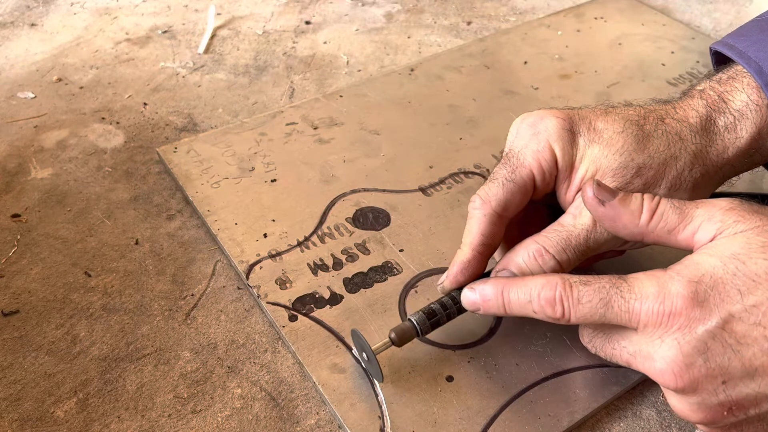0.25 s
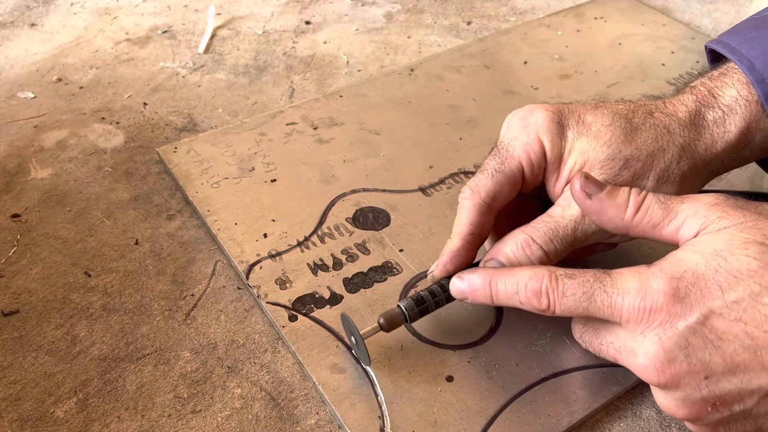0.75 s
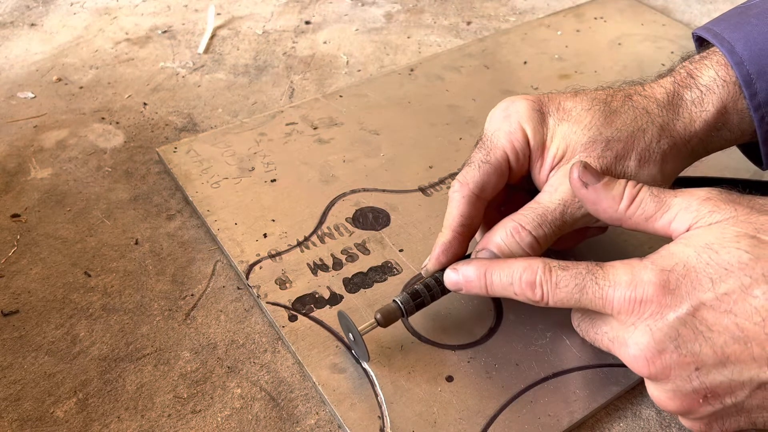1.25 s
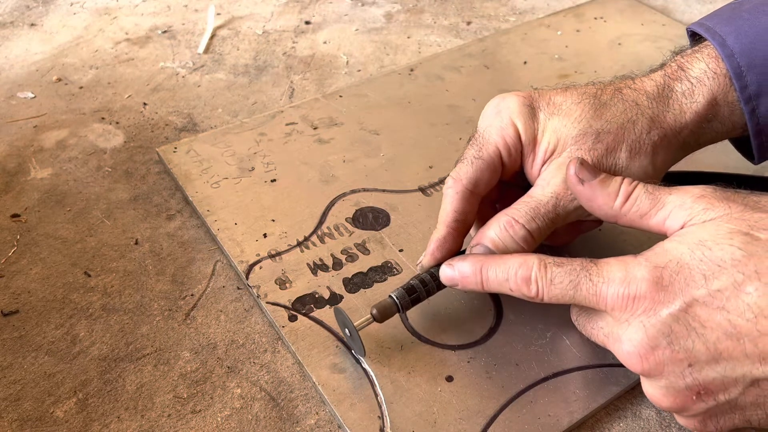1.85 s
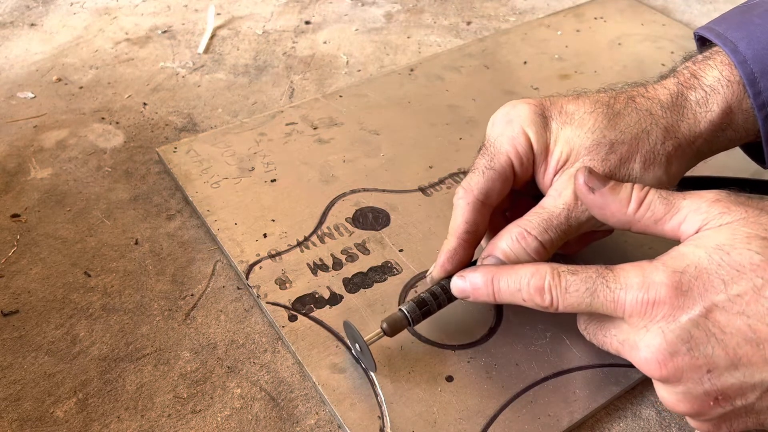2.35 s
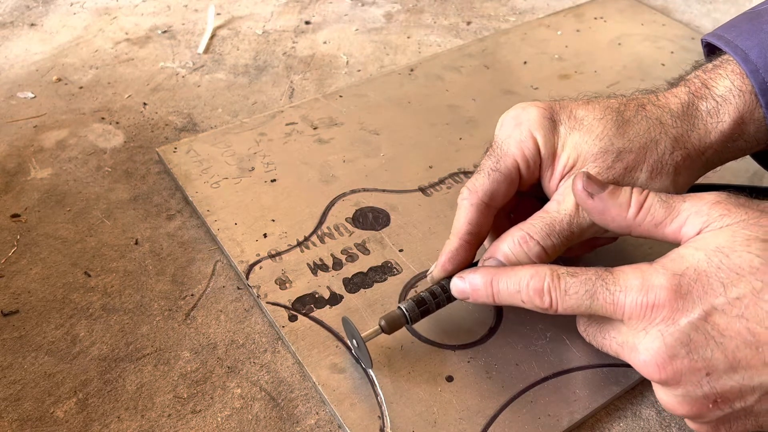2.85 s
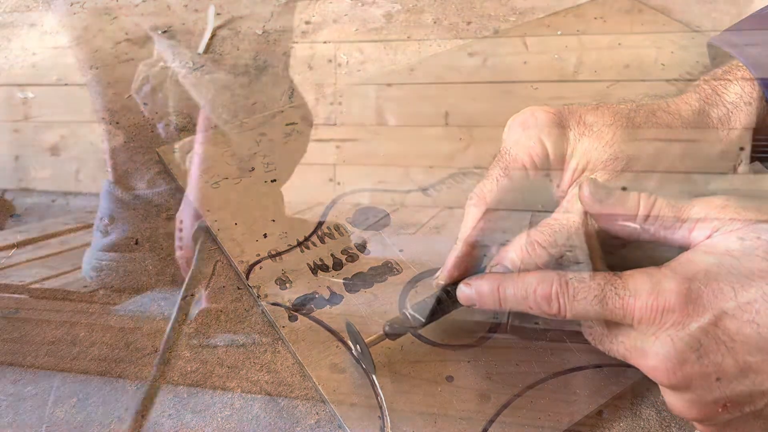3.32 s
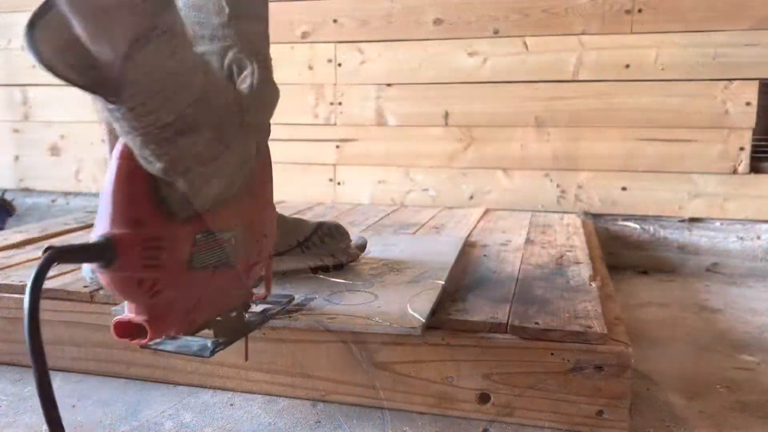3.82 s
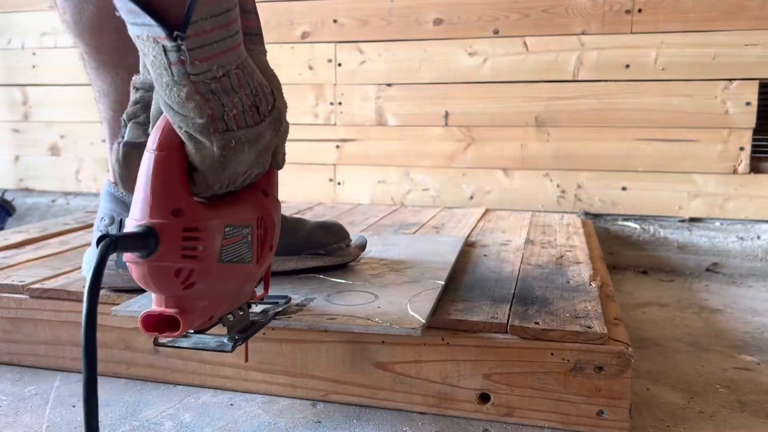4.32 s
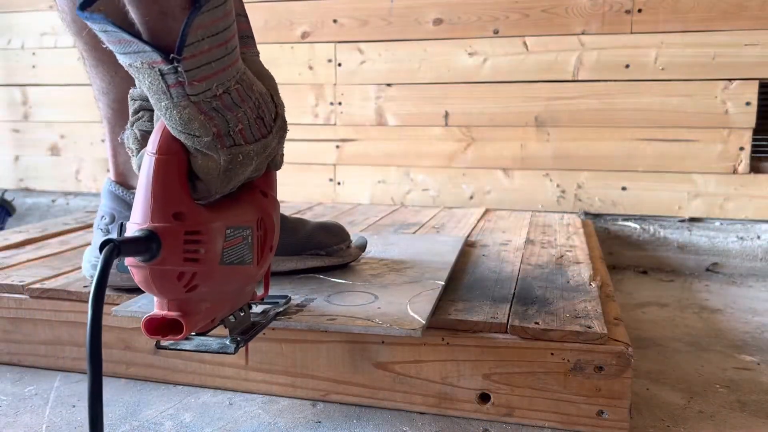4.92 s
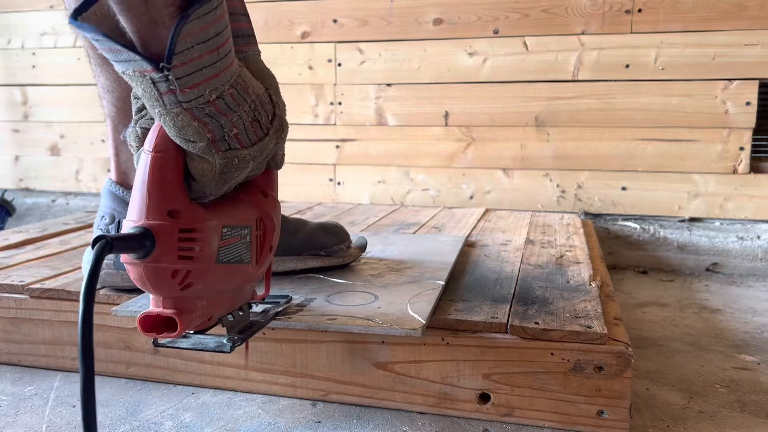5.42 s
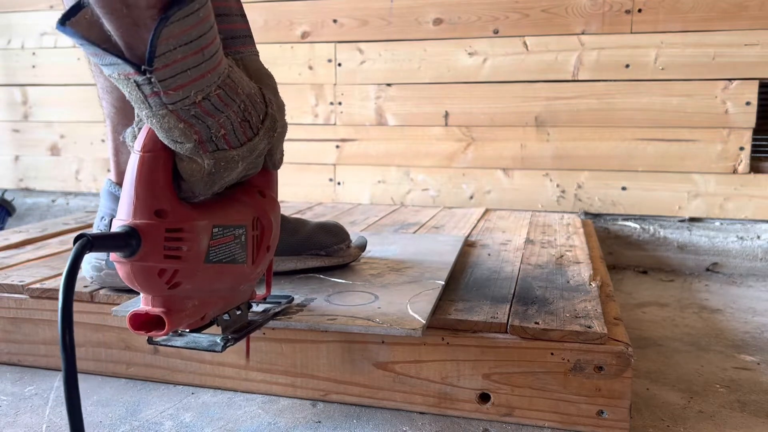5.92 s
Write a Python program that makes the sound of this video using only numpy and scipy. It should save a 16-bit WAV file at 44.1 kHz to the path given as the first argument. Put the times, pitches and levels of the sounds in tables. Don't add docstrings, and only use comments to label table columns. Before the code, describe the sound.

Phone-close stereo workshop sound. First a high-speed cutting disc bites aluminium, its bright abrasive spray and singing tones swelling with hand pressure. It chatters and dissolves into a quieter wooden room with low hum, dull board knocks and a short scrape. A hard thump starts a jigsaw, accelerating into a dense metallic rattle, coarse rasp and high gear whine, with short shed reflections.

```python
import sys
import numpy as np
from scipy import signal
from scipy.fft import rfft, irfft, next_fast_len
from scipy.io import wavfile
from scipy.ndimage import uniform_filter1d

SR = 44100
rng = np.random.default_rng(int(sys.argv[2]) if len(sys.argv) > 2 else 0)


def persist_wave(psi):
    counts = np.round(np.clip(psi, -1, 1) * 32767).astype(np.int16)
    wavfile.write(sys.argv[1], SR, np.atleast_2d(counts).T)


def voltage_ratio(decibels):
    exponent = np.asarray(decibels, float) / 20
    return 10 ** exponent


N = 272097
T = np.arange(N) / SR
M = next_fast_len(N + SR // 2)
HZ = np.arange(M // 2 + 1) * SR / M + 1


def curves(table):
    s, *columns = np.transpose(table)
    return [np.interp(T, s, column) for column in columns]


def along(table):
    hz, value = np.transpose(table)
    return np.interp(np.log(HZ), np.log(hz + 1), value)


def unit(x):
    return x / np.sqrt(np.mean(x ** 2))


def bump(x, centre, width):
    return np.exp(-((x - centre) / width) ** 2)


def ramp(start_s, length_s):
    return ((T - start_s) / length_s).clip(0, 1)


def walk(rate):
    k = int(SR / rate)
    steps = np.repeat(rng.standard_normal(N // k + 1), k)
    return 1.35 * uniform_filter1d(uniform_filter1d(steps, k), k)[:N]


def grains(spread_db):
    return rng.standard_normal(N) * voltage_ratio(spread_db * rng.exponential(size=N))


def highpass(x, hz):
    return signal.lfilter(*signal.butter(2, hz, "high", fs=SR), x)


def colour(x, spectrum):
    return unit(irfft(rfft(x, M) * voltage_ratio(along(spectrum)), M)[:N])


def patchy(x, spread_db):
    z = signal.stft(x, nperseg=1024)[2]
    field = rng.standard_normal(z.shape)
    for size, axis in ((5, 0), (5, 0), (8, 1), (8, 1)):
        field = uniform_filter1d(field, size=size, axis=axis)
    return unit(signal.istft(z * voltage_ratio(spread_db * unit(field)), nperseg=1024)[1][:N])


def mode(x, hz, width):
    return signal.lfilter(*signal.iirpeak(hz, hz / width, fs=SR), x)


def rings(x, modes, patchy_db, rate, focus_hz=None, focus_db=0, sings=()):
    out = 0
    for hz, width, db in modes:
        octaves_away = 0 if focus_hz is None else np.abs(np.log2(hz / focus_hz))
        swell_db = sum(up_db * bump(T, s, length) for s, length, f, up_db in sings if abs(np.log2(f / hz)) < .1)
        ring = unit(mode(x * voltage_ratio(patchy_db * walk(rate)), hz, width))
        out = out + voltage_ratio(db + swell_db - focus_db * octaves_away) * np.sqrt(width) * ring
    return unit(out)


# frequency in Hz, level in dB per Hz.
SHED_SPECTRUM = [(15, -30), (25, 10.5), (149, -11), (291, -20), (475, -20.5), (527, -22.5), (1600, -31),
                 (4500, -35.5), (8150, -28), (11100, -42), (12000, -71), (15600, -94), (22000, -120)]
# time in seconds, gain in dB.
SHED_FADE = [
    (0, 6),
    (3, 3),
    (3.5, 15),
    (6.17, 5),
]


def shed():
    hum = colour(rng.standard_normal(N) * voltage_ratio(1.1 * walk(5.8)), SHED_SPECTRUM)
    return hum * voltage_ratio(-56 + curves(SHED_FADE)[0])


# start in seconds, peak in dB, ring in Hz, t60 in seconds, tick in dB.
KNOCKS_ON_BOARDS = [(3.048, -41, 144, 0.091, -11), (3.297, -34.5, 85, 0.51, -25),
                    (3.421, -45, 387, 0.73, -30), (4.051, -44, 917, 0.12, -17),
                    (4.22, -40, 298, 0.057, -20), (3.2, -35, 192, 0.11, -28), (3.277, -21, 200, 0.089, -33),
                    (3.289, -30.5, 177, 0.51, -20), (3.326, -23.5, 349, 0.2, -30),
                    (3.334, -25.5, 720, 0.15, -27), (3.345, -30.5, 1060, 0.16, -25),
                    (3.374, -32, 185, 0.23, -34), (3.498, -19, 2100, 0.015, -8),
                    (3.509, -34.5, 131, 0.22, -32), (3.782, -39.5, 600, 0.15, 13),
                    (3.821, -33, 322, 0.054, -26.5), (4.163, -25.5, 423, 0.024, -23),
                    (4.33, -41, 746, 0.063, -30), (4.505, -42.5, 382, 0.12, 6),
                    (4.589, -28.5, 405, 0.073, -11), (4.603, -24.5, 349, 0.13, -1),
                    (4.667, -5, 352.5, 0.15, -38), (4.739, -10.5, 190, 0.15, -48),
                    (5.531, -3.5, 794, 0.056, -23)]


def knocks():
    out, t = np.zeros(N + SR), T[:SR // 2]
    noises = rng.standard_normal((len(KNOCKS_ON_BOARDS), len(t)))
    for (s, db, hz, t60, tick_db), noise in zip(KNOCKS_ON_BOARDS, noises):
        rough = 0.8 * np.sin(2 * np.pi * hz * t)
        rough = rough + 0.5 * unit(mode(noise, hz, 0.5 * hz)) + 0.054 * unit(mode(noise, 2.1 * hz, 1.0 * hz))
        ring = rough * (1 - np.exp(-t / 0.0034)) * voltage_ratio(-60 * t / (1.05 * t60))
        tick = voltage_ratio(tick_db) * noise * np.exp(-t / 0.00062)
        out[int(s * SR):][:len(t)] += voltage_ratio(db) * (ring + tick)
    return out[:N]


# time in seconds, level in dB.
SLIDE_LEVEL = [(3.98, -69), (4.01, -60), (4.04, -49), (4.07, -48), (4.085, -47), (4.102, -46),
               (4.107, -37.5), (4.125, -33), (4.145, -33.5), (4.165, -30.5), (4.188, -48), (4.32, -59.5),
               (4.5, -70)]
# frequency in Hz, level in dB per Hz.
SCRAPE_SPECTRUM = [(180, -56), (300, -34), (1630, -2.5), (4540, -11), (7760, -1), (12800, -10.5),
                   (13700, -30), (15200, -1), (16500, -30)]


def slide():
    scrape = colour(grains(spread_db=3.0) * voltage_ratio(2.296 * walk(90)), SCRAPE_SPECTRUM)
    moving = (T > SLIDE_LEVEL[0][0]) * (T < SLIDE_LEVEL[-1][0])
    return scrape * voltage_ratio(curves(SLIDE_LEVEL)[0] + 2.0) * moving


# start in seconds, level in dB.
SHEET_SLAPS = [(4.609, -18), (4.641, -7), (4.675, -12), (4.706, -3), (4.743, -2), (4.781, -1), (4.815, 3),
               (4.849, 2), (4.878, 3), (4.906, -1), (4.934, 0.5), (4.959, -21), (4.985, -11), (5.011, -1.5),
               (5.031, -9), (5.055, -6), (5.083, -12), (5.108, -10), (5.133, -8), (5.157, -8), (5.183, -17),
               (5.202, -16), (5.231, -13), (5.295, -17), (5.354, -10), (5.401, -10), (5.427, -11),
               (5.454, -8), (5.478, -11), (5.507, -13), (5.532, -15), (5.574, -10), (5.61, -7),
               (5.638, -6.5), (5.667, -15), (5.694, -11), (5.714, -16), (5.747, -8), (5.776, -13),
               (5.803, -17), (5.83, -8), (5.883, -8), (5.909, -13), (5.94, -9), (5.993, -9.5), (6.046, -7),
               (6.077, -12), (6.106, -10), (6.149, -12)]


def slaps():
    rise_s, fall_s = 0.0013, 0.0028
    s, db = np.transpose(SHEET_SLAPS)
    hits, t = np.zeros(N), T[:SR // 20]
    hits[(s * SR).astype(int).clip(0, N - 1)] = voltage_ratio(1.1 * (db - uniform_filter1d(db, size=9)))
    shape = (1 - np.exp(-t / rise_s)) * np.exp(-t / fall_s)
    return signal.fftconvolve(hits, shape / shape.max())[:N]


# time in seconds, gear mesh in Hz, sawing in dB, focus in the sheet in Hz.
SAWING = [(4.57, 1167, -62, 1300), (4.635, 1480, -21, 1350), (4.655, 1600, -15, 1340),
          (4.69, 2195, -19.5, 1390), (4.8, 2856, -19, 1220), (4.87, 3140, -18.5, 1060),
          (4.94, 3450, -15.5, 1960), (5.05, 3716, -17, 2020), (5.12, 3730, -18, 1560),
          (5.25, 3900, -13.5, 1440), (5.4, 3820, -14, 1070), (5.54, 3410, -17.5, 1010),
          (5.7, 3470, -19, 1200), (5.76, 3346, -21, 900), (5.86, 3400, -22, 930), (5.95, 3414, -17.5, 953),
          (6.02, 3330, -24, 990), (6.17, 3390, -22, 1050)]
# time in seconds, strokes per second.
BLADE_STROKES = [(4.57, 12.5), (4.64, 16.5), (4.7, 24.3), (4.802, 30.8), (4.924, 36.6), (5.09, 41.1),
                 (5.252, 42), (5.318, 41.4), (5.416, 39.9), (5.55, 37.7), (5.67, 36.6), (6.17, 36.1)]
# multiple of the stroke, level in dB.
STROKE_HARMONICS = [(2, -8.5), (3, -7.5), (4, -11), (5, -10), (6, -13.5), (7, -9), (8, -22), (9, -15.5),
                    (10, -11), (11, -22), (12, -10.5), (13, -6), (14, -12.5), (15, -14)]
# frequency in Hz, width in Hz, level in dB.
BOARD_MODES = [(110, 68, -19), (198, 11, -4.5), (292, 26, -10.5), (355, 22, 6.5), (468, 32, -4),
               (591, 106, -9)]
# frequency in Hz, width in Hz, level in dB.
PLATE_MODES = [(720, 250, -4.5), (900, 147, -1.5), (1060, 47, -13), (1262, 100, 0), (1440, 130, -5),
               (1747, 83, -1), (1960, 120, -0.5), (2100, 80, 0), (2300, 220, -13.5), (2730, 210, -4),
               (3460, 82, -16)]
# centre in seconds, length in seconds, frequency in Hz, gain in dB.
PLATE_SWELLS = [(3.2, 0.029, 1440, 14), (4.3, 0.027, 900, -4), (4.81, 0.069, 1440, 8.5),
                (5.03, 0.11, 900, 7.5), (4.95, 0.028, 1440, 8.5), (5.0, 0.12, 5800, 6),
                (5.06, 0.022, 2300, 10), (5.2, 0.036, 1200, 3), (5.2, .03, 2300, 9), (5.3, 0.074, 1274, 4),
                (6, 0.058, 1060, 16), (5.42, .06, 1753, 4), (11, .06, 2730, 4), (5.05, 0.093, 2730, -14),
                (4.88, .05, 720, -3), (5.6, 0.072, 720, 5), (6.5, 0.14, 900, -3.5), (5.46, 0.051, 1060, 10)]
# frequency in Hz, level in dB per Hz.
TEETH_SPECTRUM = [(29, -52), (50, -49), (181, -10), (287, -46), (357, 1.5), (655, -18), (876, -6.5),
                  (1610, -21), (2150, -11.5), (3450, -12.5), (3750, -14), (8780, -14), (10200, -16.5),
                  (11500, -20), (13900, -35), (14700, -31), (15500, -27), (16500, -58)]


def jigsaw():
    trigger_s, run_up_s = 4.605, 0.051
    jolt_s, jolt = 5.532, 4
    mesh_hz, saw_db, focus_hz = curves(SAWING)
    running = ramp(trigger_s, run_up_s) ** 2
    mesh = np.cumsum(mesh_hz) / SR
    stroke = np.cumsum(curves(BLADE_STROKES)[0]) / SR

    pull = 1.05 * slaps()
    cut = (1.8 + pull) * voltage_ratio(0.42 * walk(60)) * grains(spread_db=0.64)
    cut = cut * (1 + jolt * np.exp(-(T - jolt_s).clip(0) / 0.00071) * (T > jolt_s))

    pinned_db = -9 * ramp(5.47, .06)
    shake = 0
    for k, db in STROKE_HARMONICS:
        wander = voltage_ratio(2.5 * walk(5.4) + (k < 4) * pinned_db)
        shake = shake + voltage_ratio(db) * np.sin(2 * np.pi * k * stroke + k * k) * wander
    shake = shake + 1.5 * mode(shake, 189, 26.37) + 2.2 * mode(shake, 380, 32)
    shake = shake * (mesh_hz / 3750) ** 1.7 * voltage_ratio(-26.5)
    boards_db = -22.5 + 10.5 * bump(T, 4.685, 0.21) + 9 * bump(T, 5.57, 0.24)
    boards = (rings(cut, BOARD_MODES, patchy_db=4, rate=16) * voltage_ratio(boards_db - 6.5) + shake) * running

    plate = rings(cut, PLATE_MODES, patchy_db=1.0, rate=10, focus_hz=focus_hz, focus_db=8, sings=PLATE_SWELLS)
    plate = plate * voltage_ratio(saw_db - 2.5)

    rasp_db = -24 - 3.5 * (T - 4.8).clip(0)
    teeth = colour(cut * (6.5 + pull), TEETH_SPECTRUM) * voltage_ratio(rasp_db + 2.5) * running
    edge = signal.sosfiltfilt(signal.butter(6, 3600, "high", fs=SR, output="sos"), teeth)
    teeth = teeth - edge * (1 - voltage_ratio(-4 * ramp(5.56, 0.019)))

    gear_db = -32 + 17 * bump(mesh_hz, 2750, 320) + 7 * ramp(5.52, .05)
    whine = np.sin(2 * np.pi * mesh + .95 * walk(400))
    whine = whine + 0.44 * np.sin(2 * np.pi * 1.55 * mesh + 1.4 * walk(250))
    gear = whine * (0.35 + 0.76 * pull) * voltage_ratio(gear_db + 2.5 * walk(70)) * running

    return highpass((boards + plate + teeth + gear) * (T > SAWING[0][0]), 60)


# time in seconds, shaft turns in Hz, bounce in Hz.
SHAFT_SPEED = [(0, 255, 51), (.14, 255, 51), (.22, 267, 51), (.36, 311, 47), (.64, 318, 43), (.92, 329, 39),
               (1.14, 338, 39), (1.34, 325, 43), (1.76, 283, 47), (1.9, 268, 52), (2.32, 239, 59.5),
               (2.6, 236, 59), (2.81, 278, 59), (2.9, 286, 59), (3.02, 281, 59), (3.16, 257, 59),
               (3.35, 222, 48)]
# time in seconds, grinding in dB, flexing of the sheet in dB,
# bounce depth from 0 to 1, clean bite in dB.
HAND_PRESSURE = [(0, -23, -44, 0.6, -12), (.3, -23.5, -50, 0.4, -9.5), (.55, -22.5, -36, 0.45, -15.5),
                 (.8, -23.5, -31.5, 0.07, -16), (1.0, -24, -33, 0.38, -9), (1.2, -21, -34, 0.66, -24),
                 (1.4, -22, -32.5, 0.68, -43), (1.66, -22.5, -32.5, 0.9, -90), (1.95, -21.5, -37, 0.72, -6),
                 (2.14, -21, -45, 0.1, -21), (2.32, -25, -50, 0.58, -6.5), (2.62, -24, -38.5, 0.78, -8.5),
                 (2.77, -22.5, -35, 0.4, -16), (2.82, -27, -37, 0.08, -1), (3.05, -27.5, -46, 0.02, -3.5),
                 (3.2, -28, -41.5, 0.6, -11), (3.36, -31, -45, 0.6, -15), (3.6, -31, -18, 0.3, -18)]
# frequency in Hz, half width in Hz, level in dB.
BENDING_MODES = [(426, 50, 1), (720, 39.5, 4.5), (1083, 33, 4), (1308, 45, 3.5)]
# centre in seconds, length in seconds, level in dB.
LOW_SWELLS = [
    (0.16, 0.3, -39),
    (1.248, 0.2, -44),
    (1.763, 0.42, -38.5),
    (2.444, 0.74, -41),
    (2.982, 0.15, -32),
]


def bending(turn, beat):
    step, end = 128, int(SHAFT_SPEED[-1][0] * SR)
    t = T[:end:step]
    hz, bounce_hz = (c[:end:step] for c in curves(SHAFT_SPEED))
    _, bend_db, depth, _ = (c[:end:step] for c in curves(HAND_PRESSURE))
    depth = depth.clip(0, 1)
    low = sum(voltage_ratio(db - bend_db) * bump(t, s, length) for s, length, db in LOW_SWELLS)
    tension = 0.93 + 0.042 * t - 0.059 * bump(t, 2.32, 0.47)
    out = np.zeros(N)
    for k in range(1, 6):
        for m in range(-4, 5):
            line_hz = k * hz + m * bounce_hz
            gains = []
            for f, half, db in BENDING_MODES:
                mode_hz = f * (tension if f > 600 else 1)
                gains.append(voltage_ratio(db) / (1 + ((line_hz - mode_hz) / half) ** 2) ** 1.46)
            share = depth * 0.66 ** abs(m) if m else 1 - depth
            gain = share * (gains[0] * low + sum(gains[1:]) + voltage_ratio(-39))
            line = np.sin((k * turn + m * beat)[:end] + k * k + m * m)
            out[:end] += np.repeat(gain, step)[:end] * line
    return out


# multiple of 284 Hz, level in dB.
BITE_RESPONSE = [(1, -22), (2, -16), (3, -11), (4, -9), (5, -11), (6, -16), (7, 0), (8, -6), (9, -1),
                 (10, -9), (11, -4), (12, -5), (13, -20), (14, -10), (15, -9), (16, -10), (17, -15),
                 (18, -11), (19, -12), (20, -10), (21, -14), (22, -12)]
# frequency in Hz, width in Hz, level in dB.
SHEET_MODES = [(1912, 45, -11.5), (2228, 21, -5.5), (2607, 53, -9.5), (3180, 126, -7.5), (4183, 38, 2.5),
               (4940, 19, -7), (5227, 23, 3), (5565, 176, -1.5)]
# centre in seconds, length in seconds, frequency in Hz, gain in dB.
SHEET_SWELLS = [(0.15, 0.12, 2227, 6.5), (.58, .08, 3175, -1), (0.87, 0.13, 3175, 6),
                (1.11, 0.11, 3175, 5.5), (.95, 0.17, 2607, -2), (1.1, 0.059, 2607, 15),
                (1.126, .04, 4183, 4), (1.26, 0.097, 4183, 1), (0.65, 0.1, 5216, 3.5),
                (0.15, 0.43, 5216, 0.5), (0.13, 0.2, 5560, 1.5), (0.72, 0.049, 5560, 2.5),
                (1.51, .08, 2607, 5), (1.8, 0.062, 4183, 4), (2.4, 0.16, 4183, 6.5), (2.53, 0.3, 2227, 4.5),
                (2.37, 0.19, 1937, 2), (1.59, 0.066, 3175, 5), (1.9, 0.088, 1937, 1.5),
                (1.75, 0.11, 2607, 3), (4.3, 0.085, 5560, 1), (0.93, .12, 1937, -16), (0.72, 0.17, 2227, 1)]
# centre in seconds, length in seconds, focus in Hz, gain in dB.
DISC_CATCHES = [(0.103, 0.088, 2100, 8.5), (0.27, 0.045, 2640, -13), (.345, 0.011, 2300, 14.5),
                (.378, 0.021, 2640, -28), (0.545, 0.14, 2630, 10), (0.74, 0.043, 2440, -1),
                (0.96, 0.27, 2750, 5), (1.17, 0.067, 2980, 3), (1.43, 0.2, 2550, 8.5),
                (1.927, 0.14, 2320, 9), (2.24, .07, 2250, 0.5), (2.427, 0.25, 2300, 8.5)]
# time in seconds, focus in Hz, level in dB.
UPPER_TONES = [(0, 5300, 5.5), (.4, 4900, -5), (.8, 5250, 5), (1.15, 4170, 0), (1.55, 5140, 1),
               (1.95, 4900, -0.5), (2.3, 5660, 4.5), (2.55, 5100, 5), (2.8, 4440, 3), (3.1, 5740, 1),
               (3.6, 5200, -1)]
# frequency in Hz, width in Hz, level in dB.
DISC_MODES = [(7260, 15, 7), (7900, 84, -7), (8380, 30, 5), (8944, 25, 14.5), (8620, 35, 9), (9110, 120, 8),
              (11170, 16, 2), (11980, 18, 3), (13800, 44, -35), (14900, 73, 7), (15300, 98, -24)]
# frequency in Hz, level in dB per Hz.
GRIT_SPECTRUM = [(88, -71), (150, -43), (560, -18), (709, -15), (898, -16), (1650, -6.5), (2550, 0),
                 (3300, -5.5), (3720, -4), (4200, -5.5), (5380, -4), (6600, -5.5), (7200, -6), (8970, 0.5),
                 (9600, 3), (10300, 5), (11600, -6), (12600, -11), (13600, -15), (15000, 3), (15800, 2),
                 (16500, -43)]


def disc():
    lift_s, chatter_ends_s = 3.375, 3.65
    chatter_hz, chatter_depth = 51.5, .75
    fade_start_s, fade_end_s = 3.464, 3.9
    hz, bounce_hz = curves(SHAFT_SPEED)
    grind_db, bend_db, depth, clean_db = curves(HAND_PRESSURE)
    clean = voltage_ratio(clean_db)
    fade = 1 - ramp(fade_start_s, fade_end_s - fade_start_s)
    turn = 2 * np.pi * np.cumsum(hz * (1 + 0.00148 * walk(30.27))) / SR
    beat = 2 * np.pi * np.cumsum(bounce_hz * (1 + 0.0065 * walk(8.6))) / SR

    landing = unit(np.exp(0.17 * (np.cos(beat) - 1)))
    stack = 0
    for k in range(3, 22):
        response_db = np.interp(k * hz / 284, *np.transpose(BITE_RESPONSE))
        level = voltage_ratio(4 * walk(16) + response_db)
        stack = stack + level * np.sin(k * turn + 0.32 * k * k + .045 * k * walk(90))
    bite = unit(stack) * (1 - depth + depth * landing) * (T < lift_s)

    skip = chatter_depth * (T > lift_s) * (T < chatter_ends_s)
    hop_phase = 2 * np.pi * chatter_hz * (T - lift_s) + 0.33 * walk(25)
    hop = 2 * np.exp(0.53 * (-np.cos(hop_phase) - 1))
    contact = (1 + 0.15 * np.cos(turn)) * (1 + 0.13 * depth * np.cos(beat))
    contact = contact * voltage_ratio(0.78 * walk(25.07) + 0.23 * walk(18.0))
    spray = unit(contact * grains(spread_db=-0.3)) * (1 - skip + skip * hop * voltage_ratio(1.2 * walk(45)))
    loose = spray * voltage_ratio(-2.5 * clean)
    both = loose + 0.86 * bite * clean

    focus_hz = 2640 + sum((f - 2640) * bump(T, s, length) for s, length, f, _ in DISC_CATCHES)
    sheet_db = -8.5 + sum(db * bump(T, s, length) for s, length, _, db in DISC_CATCHES)
    lower = rings(both, SHEET_MODES[:4], patchy_db=1.5, rate=14, focus_hz=focus_hz, focus_db=19, sings=SHEET_SWELLS)
    lower = lower * voltage_ratio(sheet_db - 6.5 + 0.97 * walk(9.4))
    upper_hz, upper_db = curves(UPPER_TONES)
    upper = rings(both, SHEET_MODES[4:], patchy_db=2.0, rate=14, focus_hz=upper_hz, focus_db=15.0, sings=SHEET_SWELLS)
    upper = upper * voltage_ratio(-10 + upper_db)

    hiss_db = -7.5 + 12.5 * clean + 2.8 * walk(4.25)
    ringing = rings(spray, DISC_MODES, patchy_db=1.0, rate=7.21) * voltage_ratio(hiss_db)
    grit = patchy(colour(loose, GRIT_SPECTRUM), 2.8) * voltage_ratio(-1.5)
    whine = 0.92 * bite * clean * ((T - 2.8) / .03).clip(.15, 1)
    shaft_hum = np.sin(turn) * voltage_ratio(-58.5 + 2 * walk(3.72))
    tones = (bending(turn, beat) * voltage_ratio(bend_db - 4.0) + shaft_hum) * (T < lift_s)
    rasp = highpass(lower + upper + ringing + grit + whine, 700)
    return (rasp * voltage_ratio(grind_db) + tones) * fade


# frequency in Hz, level difference in dB.
PORT_DIFFERENCE = [(60, 1.5), (110, 1), (200, 0), (380, 2), (700, 3.5), (1290, 4.5), (2380, 1), (4400, 9),
                   (8120, 2.5), (15000, -1)]
# frequency in Hz, lead in radians.
PORT_PHASE = [(100, 0.035), (1000, 0.32), (3000, 0.89), (4000, 1.12), (6000, 0.96), (8000, 0.87),
              (10000, 2.08), (12000, 1.2), (16000, 1.84)]
# frequency in Hz, level in dB.
RESTLESS_SHARE = [(300, -25), (1000, -8), (2500, -6.5), (5000, -6.5), (8000, -12.5), (16000, -14)]
# frequency in Hz, level in dB.
ECHO_SHARE = [(100, -25), (400, -11.5), (1500, -9), (4000, -9), (8000, -36), (16000, -21)]


def scene():
    direct = shed() + knocks() + slide() + jigsaw() + disc()
    sound = rfft(direct, M)
    restless = rfft(direct * walk(60), M) * voltage_ratio(along(RESTLESS_SHARE))
    tail = rng.standard_normal(SR // 2) * voltage_ratio(-60 * T[:SR // 2] / 0.088)
    echo = rfft(tail / np.sqrt(np.sum(tail ** 2)), M) * voltage_ratio(along(ECHO_SHARE))
    half = voltage_ratio(along(PORT_DIFFERENCE) / 2) * np.exp(.5j * along(PORT_PHASE))
    ports = sound * np.array([half + echo, 1 / half - echo])
    return irfft(ports + restless * np.array([[1], [-1]]), M)[:, :N]


def top_cut(x):
    return signal.sosfilt(signal.butter(12, 17110, fs=SR, output="sos"), x)


# frequency in Hz, level in dB.
MICROPHONE_RANGE = [(20, -49), (60, -4), (120, -1), (15850, 0.5), (16000, -50)]


def record(dry):
    heard = irfft(rfft(dry, M) * voltage_ratio(along(MICROPHONE_RANGE)), M)[:, :N]
    return top_cut(np.tanh(1.05 * heard) / 1.05)


dry = scene()
out = record(dry)
persist_wave(out)
```